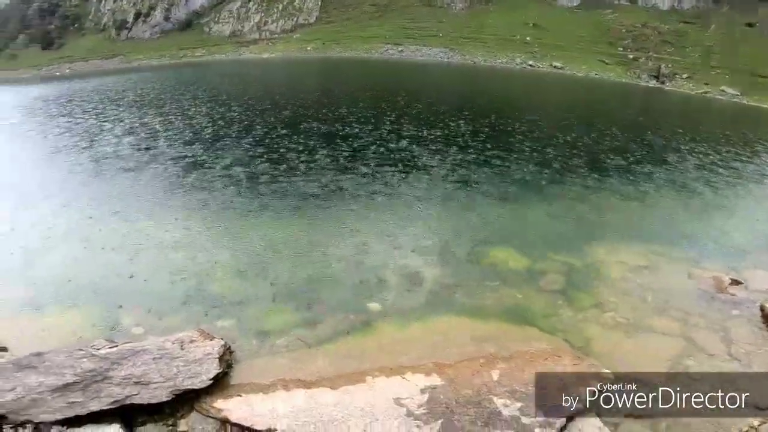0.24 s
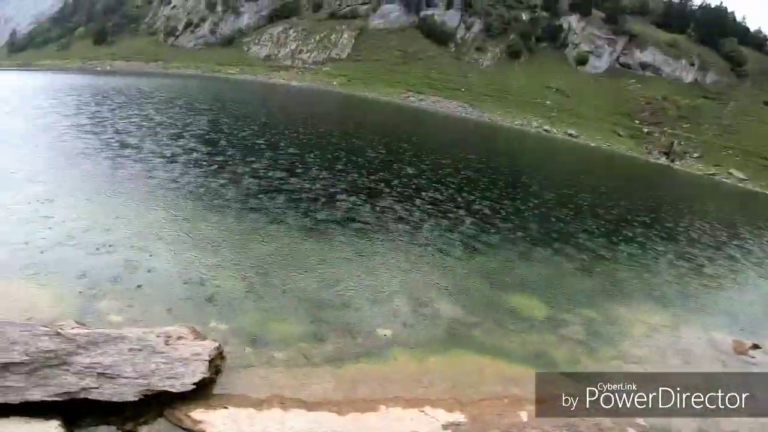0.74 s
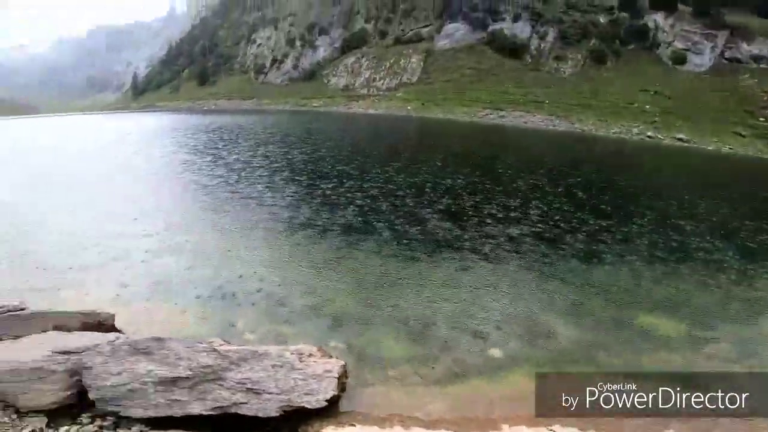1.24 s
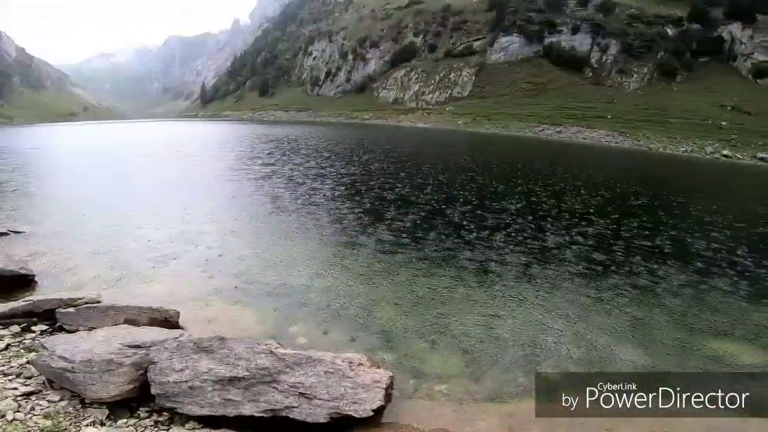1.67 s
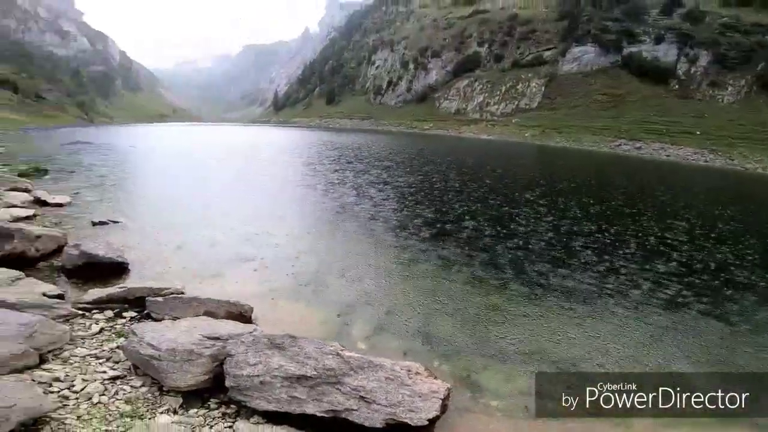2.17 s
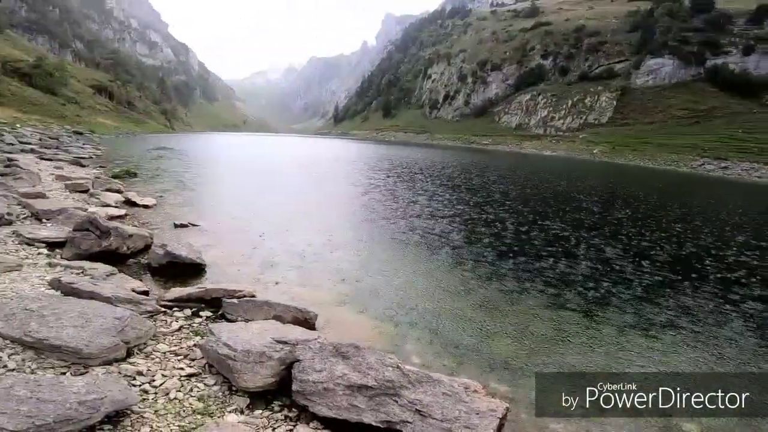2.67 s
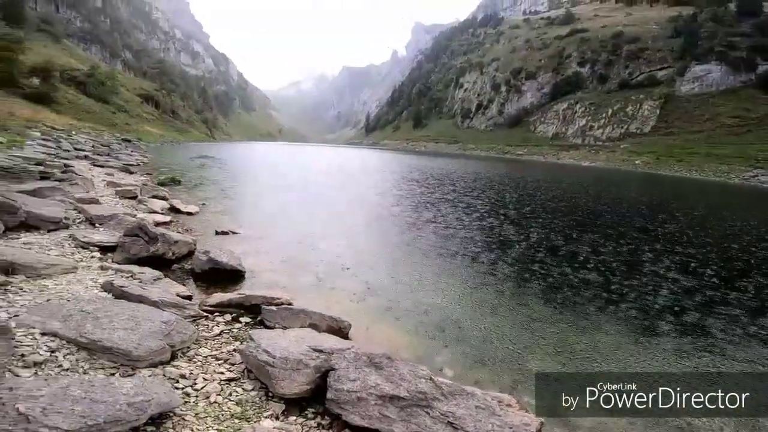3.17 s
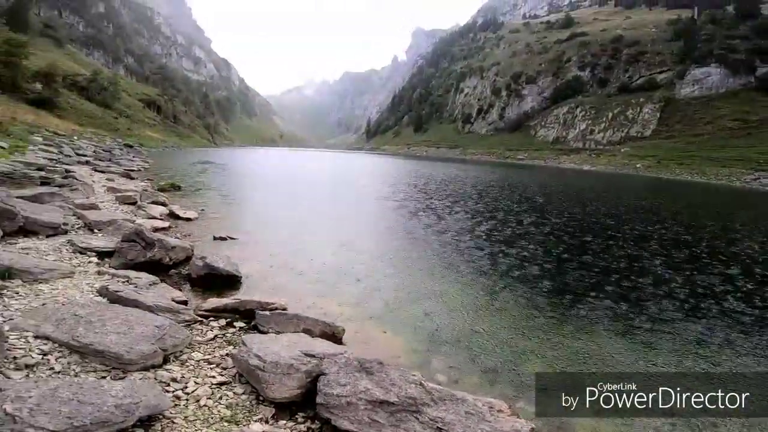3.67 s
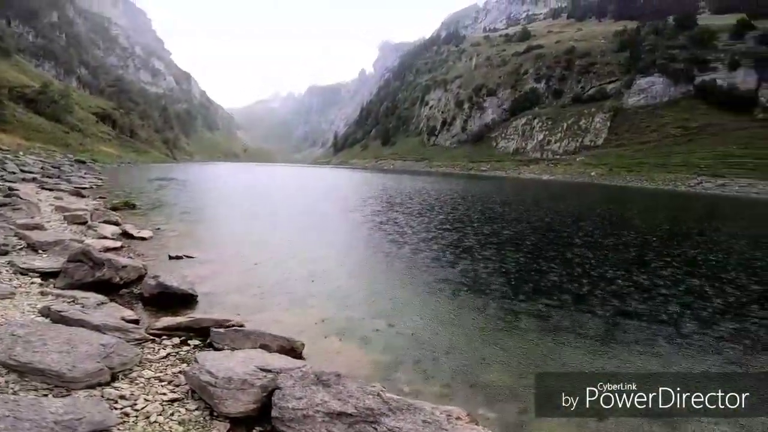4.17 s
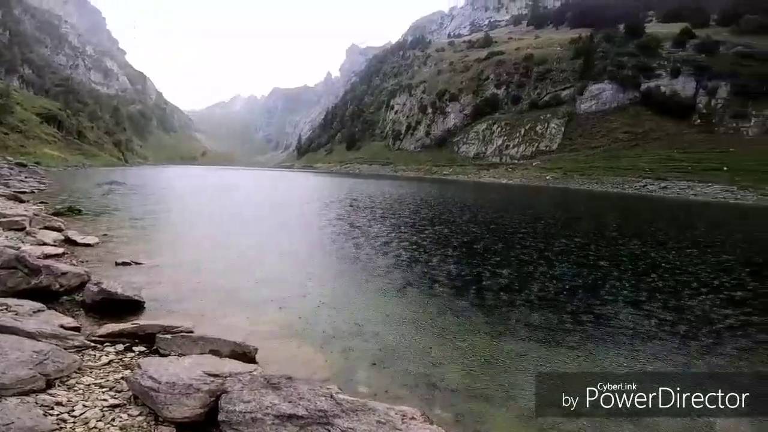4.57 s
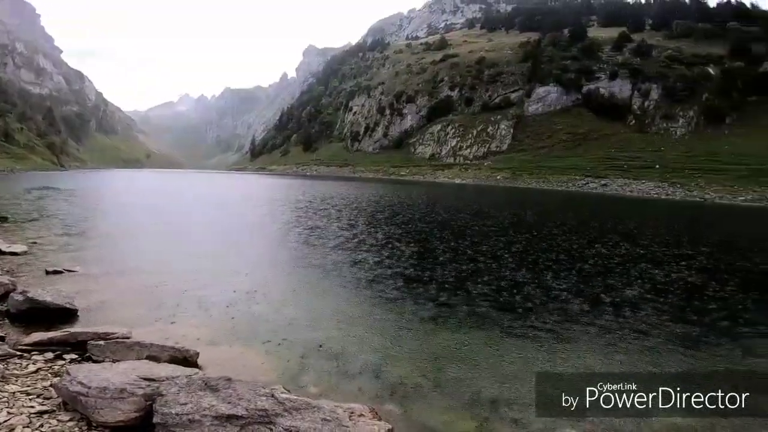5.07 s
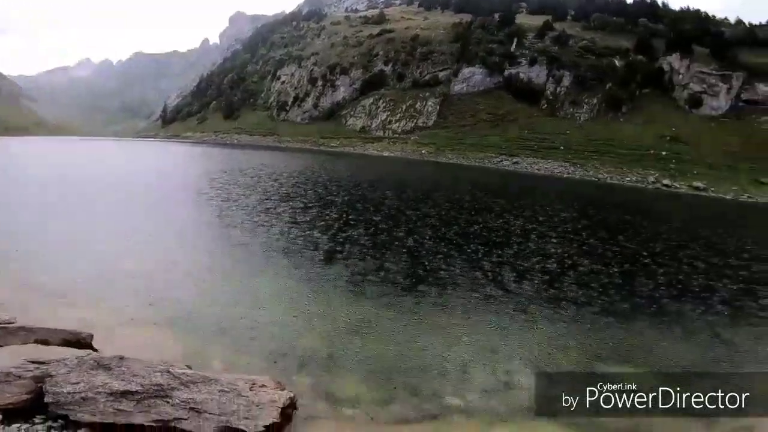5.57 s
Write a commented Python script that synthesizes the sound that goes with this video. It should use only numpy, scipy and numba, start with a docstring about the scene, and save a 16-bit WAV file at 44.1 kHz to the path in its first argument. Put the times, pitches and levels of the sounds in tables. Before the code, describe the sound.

Light rain falls steadily beside a still lake, heard through a hand-held phone. A quiet, wide hiss of distant rain lies beneath a dense patter of tiny bright ticks on water and rock, with nearer drops clicking at irregular moments and a few short, rising bubble plips. A faint low hum wavers underneath. From about 0.2 to 0.9 seconds the hand shifts on the phone: low thumps, rumble, small clicks and skin rubs. A light tap comes near 1.2, then hollow plastic knocks at 1.8 and 2.4. The rain continues evenly. A very loud, sharp crack strikes the case at 3.8, a softer tap at 4.25, and another loud, bright crack at 4.5. From 4.7 to the end at about 5.8, taps, scrapes and dull bumps return. The image begins mono and gradually opens to stereo after one second; there is no noticeable echo.

```python
"""Light rain on a still lake and shore rocks

Heard by a hand-held phone with two microphone ports. Far rain is banded noise; nearer drops are damped sines.
Drops and fingers tap the case and ring its modes; the hand rubs, presses and jolts it. A low narrow-band hum wavers.
The sound starts in mono and opens to stereo; loud peaks saturate softly and duck all but the bass."""
import sys
import numpy as np
from scipy import signal
from scipy.fft import rfft, irfft, next_fast_len
from scipy.io import wavfile
from scipy.ndimage import uniform_filter1d
from numba import njit

SR = 44100
rng = np.random.default_rng(int(sys.argv[2]) if len(sys.argv) > 2 else 0)


def output_pcm(signal):
    """Save a mono or channel-first signal as 16-bit PCM at the path in sys.argv[1].

    Samples are clipped to [-1, 1] before scaling.
    """
    pcm = np.clip(np.atleast_2d(signal).T, -1, 1) * 32767
    wavfile.write(sys.argv[1], SR, np.round(pcm).astype(np.int16))


N = 256662

# bending modes of the phone case: nominal_hz, level_db, t60_s, left_minus_right_db, left_lead_rad
CASE_MODES = [(422.5, 7, 0.022, -6, 3.5), (578, 7.5, 0.041, -3.5, 3), (740, 0.5, 0.014, -3.5, 4),
              (958, 11.5, 0.0088, -1, 4), (1272, 6, 0.016, 2.5, 3.5), (1448, 8.5, 0.017, 1, 3.5),
              (1840, 7.5, 0.0083, 1, 4), (2110, -0.5, 0.013, 9.5, 4.5), (2410, 5, 0.018, -2.5, 2.5),
              (2910, 5.5, 0.013, 3.5, 1.5), (3774, 2.5, 0.0078, 0, 0.8), (4560, -1, 0.0082, -7, 1),
              (5290, 3, 0.011, -2.5, 2), (6064, 14, 0.0056, 8, -1.33), (7750, 13, 0.0039, 7, 1)]
LOW_LEFT_GAIN = -0.28  # left port relative to right, for thuds and drone


def undb(db):
    """Amplitude ratio of a level in dB."""
    return 10 ** (np.asarray(db) / 20)


def level(x, rms_db=0):
    """Scale to an RMS level."""
    return x * undb(rms_db) / np.sqrt(np.mean(x ** 2))


def band(x, hz, width_hz):
    """Two-pole resonance, gain 1 at the centre."""
    return signal.lfilter(*signal.iirpeak(hz, hz / width_hz, fs=SR), x)


def cut(x, hz, kind, order=2):
    """Butterworth low-pass or high-pass."""
    return signal.sosfilt(signal.butter(order, hz, kind, fs=SR, output="sos"), x)


def walk(rate_hz):
    """Random levels held 1 / rate_hz and smoothed twice; spread near 1."""
    hold = int(SR / rate_hz)
    steps = np.repeat(rng.standard_normal(N // hold + 1), hold)
    return 1.65 * uniform_filter1d(uniform_filter1d(steps, hold), hold)[:N]


@njit
def rings(s, hz, t60_s, glide, left, right, n):
    """Damped sines, one per event; glide multiplies the pitch at each sample."""
    out = np.zeros((2, n))
    for k in range(len(s)):
        i, z = int(s[k] * SR), 1 + 0j
        fade, turn = np.exp(-np.log(1000) / (t60_s[k] * SR)), 2 * np.pi * hz[k] / SR
        while i < n and abs(z) > .002:
            out[0, i] += left[k] * z.imag
            out[1, i] += right[k] * z.imag
            z *= fade * np.exp(1j * turn)
            turn *= glide[k]
            i += 1
    return out


def ports(modes):
    """Each bending mode moves the two ports by its own amounts, with a phase lead on the left; modes are analytic."""
    _, _, _, pan_db, lead_rad = np.transpose(CASE_MODES)
    left = undb(pan_db / 2) * np.exp(1j * lead_rad) @ modes
    right = undb(-pan_db / 2) @ modes
    return np.array([left, right]).imag


def stirred(hz, centre_hz, above_oct, below_oct):
    """Share of a mode in a contact: Gaussian in octaves, with its own spread above and below the centre."""
    octaves = np.log2(hz / centre_hz)
    return np.exp(-.5 * (octaves / np.where(octaves < 0, below_oct, above_oct)) ** 2)


def touch(start_s, hold_s, rise_db_s, fall_db_s):
    """Gain of each contact over time: rises, holds and falls at steady dB rates."""
    t = np.arange(N) / SR - start_s[:, None]
    rise_db = rise_db_s * t
    fall_db = fall_db_s * (hold_s[:, None] - t)
    return undb(np.minimum(0, np.minimum(rise_db, fall_db)).clip(-120))


def hiss(colour, rms_db, swell_db):
    """Merged far drops: overlapping bands of noise at half-octave steps that swell together and flicker alone."""
    size = next_fast_len(N, real=True)
    hz = np.fft.rfftfreq(size, 1 / SR)[1:]
    colour_hz, colour_db = np.transpose(colour)
    shape = undb(np.interp(np.log(hz), np.log(colour_hz), colour_db))
    noise = rfft(rng.standard_normal(size))[1:] * shape
    out = 0
    for centre_oct in np.arange(4.5, 14.5, .5):  # octaves above 1 Hz
        share = np.clip(1 - 2 * abs(np.log2(hz) - centre_oct), 0, 1)
        flicker_db = (2.14 if centre_oct < 10.2 else 1.0) * walk(13)
        out = out + irfft(np.append(0, noise * share), size)[:N] * undb(flicker_db)
    return level(out * undb(swell_db), rms_db)


def far_rain():
    """Far rain and air: one hiss common to both ports, one opposed between them, on the same swell."""
    # noise colour of the common and the opposed part: hz, relative_db_per_hz
    mid_colour = [(18, -42), (30, -1.5), (86, -24), (131, -9.5), (161, 0), (554, -20), (740, -12.5),
                  (962, -14.5), (1500, -10), (3580, -7.5), (5900, -13), (7670, -26.5), (8980, -37),
                  (12300, -47.5), (16000, -61)]
    side_colour = [(18, -44.5), (30, -14.5), (95, -15), (141, -1.5), (184, -3), (554, -17), (844, -7),
                   (962, -11), (2230, -10.5), (3400, -14), (5900, -11.5), (7670, -22), (9710, -38.5),
                   (12300, -45.5), (16000, -64)]
    swell_db = .4 * walk(1.2) + 1.29 * walk(70)
    mid = hiss(mid_colour, -55, swell_db)
    side = hiss(side_colour, -55.5, swell_db)
    return mid + np.outer([1, -1], side)


def hum(centre_hz=154.6, width_hz=43, left_gain=0.45, waver_db=2.5):
    """Narrow-band noise of wavering level, stronger in the right port."""
    # hum level before the waver: time_s, level_db
    hum_levels = [(0, -69.5), (.5, -58), (.95, -58.5), (1.15, -51), (1.35, -54.5), (1.6, -69), (2.2, -55),
                  (2.55, -64.5), (2.9, -59), (3.3, -68), (4.1, -62), (4.6, -66.5), (5.1, -69), (5.48, -49),
                  (5.82, -61)]
    tone = level(band(band(rng.standard_normal(N), centre_hz, width_hz), centre_hz, width_hz))
    slow_db = np.interp(np.arange(N) / SR, *np.transpose(hum_levels))
    return np.outer([left_gain, 1], tone * undb(slow_db + waver_db * walk(6)))


def patter(count, floor_db, scatter_db, hz, spread_oct, cycles):
    """Small drops at random moments and places ring for some cycles; a few are much nearer than the rest."""
    moment, nearness = rng.random((count, 2)).T
    pitch_draw, ring_draw, pan_draw = rng.standard_normal((count, 3)).T
    size = undb(floor_db - scatter_db * np.log(nearness).clip(-2.2, 0))
    pitch_hz = hz * 2 ** (spread_oct * pitch_draw)
    t60_s = cycles * 2 ** (1.01 * ring_draw) / pitch_hz
    pan = undb(2.2 * pan_draw - 2.0)
    return rings(moment * N / SR, pitch_hz, t60_s, np.ones(count), size * pan, size / pan, N)


def drops(table, t60_s, rise_per_s, splash_db):
    """A near drop rings briefly under a shorter, brighter splash; rise_per_s is relative pitch growth."""
    s, db, hz, pan_db = np.transpose(table)
    left, right = undb(db + pan_db / 2), undb(db - pan_db / 2)
    steady = np.ones(len(s))
    glide, t60_s = (1 + rise_per_s / SR) * steady, t60_s * steady
    slow = rings(s, hz, t60_s, glide, left, right, N)
    # taking away a faster ring softens the first cycles
    fast = rings(s, hz, t60_s / 8, glide, left, right, N)
    splash = rings(s, 1.07 * hz, 0.0021 * steady, steady, left, right, N)
    return 0.63 * (slow - fast) + undb(splash_db) * splash


def near_drops():
    """Near drops tick on rock and water: short rings of steady pitch."""
    # near drops: start_s, nominal_level_db, pitch_hz, left_minus_right_db
    drop_table = [(0.1353, -41, 2840, 0.0), (0.1833, -37, 2600, 0.0), (.2124, -47, 2700, 0),
                  (0.2377, -41, 2490, -1), (.3197, -46, 2120, 0), (.4449, -42, 2620, 0),
                  (0.599, -36, 2410, 0.0), (.632, -42, 5400, 0), (.7527, -40, 5170, 0),
                  (.766, -44, 2640, 0), (.7996, -47, 2520, 0), (0.9814, -41.5, 2600, 0.0),
                  (1.055, -47.5, 2830, 2), (1.1643, -42, 4580, -0.5), (1.2735, -51, 3670, -1),
                  (1.323, -39, 2210, 0), (1.4511, -42, 2670, -1), (1.4641, -40.5, 3250, -1.0),
                  (1.5753, -38.5, 3600, 0.5), (1.6417, -43, 4350, -1), (1.708, -31.5, 3970, -1),
                  (1.7564, -43.5, 3630, -1), (1.8956, -39.5, 4270, -0.5), (1.933, -38.5, 2880, 4),
                  (1.9579, -38, 4490, 1.0), (2.0138, -41.5, 5740, 0), (2.0448, -41, 2900, -1),
                  (2.128, -41.5, 3700, 0), (2.145, -37, 4300, -0.5), (2.204, -35.5, 3910, 0.0),
                  (2.267, -30, 3900, -0.5), (2.5067, -40, 3670, -2.5), (2.5205, -43, 2990, -6),
                  (2.5381, -48.5, 3600, 0), (2.6484, -41.5, 3040, 0), (2.7641, -49, 2840, -8),
                  (2.7921, -42, 2860, -4.5), (2.9176, -37, 3680, -6), (3.045, -53, 3550, -2),
                  (3.1635, -45, 3860, -2), (3.2022, -43.5, 4780, -7), (3.3832, -42.5, 4920, -3),
                  (3.4103, -36.5, 3930, -5), (3.473, -40, 4360, 1), (3.485, -36.5, 3500, -3),
                  (3.5117, -36.5, 3100, -1.0), (3.6451, -37, 3410, -1), (3.7062, -39, 4020, -6),
                  (3.9709, -37.5, 3000, -1.0), (4.0113, -38, 3570, -1.5), (4.0895, -38, 3900, -2.5),
                  (4.2083, -44, 3750, -3), (4.312, -35, 3120, -9), (4.409, -42, 5170, -12),
                  (4.4544, -41, 3970, -8), (4.465, -33, 3290, -9.5), (4.4997, -38.5, 4240, -1),
                  (4.6857, -41.5, 4080, -4), (4.7361, -39.5, 3900, -1), (4.9257, -40, 4600, -1),
                  (4.9514, -38.5, 3370, -2.0), (5.022, -39, 4520, -9), (5.1632, -43, 3620, 3),
                  (5.3932, -36, 3410, 0.0), (5.4148, -33, 3980, -1.5), (5.4929, -39, 3310, -1),
                  (5.611, -41, 4000, -1), (5.62, -42.5, 4020, 1), (5.7044, -43, 3920, 6.5),
                  (5.796, -42, 4940, 1)]
    return drops(drop_table, t60_s=0.01, rise_per_s=0, splash_db=4.5)


def grip(shake_db=1.5):
    """The pressing hand makes rumble in both ports and a dull drone mostly in the right one."""
    # hand presses: start_s, hold_s, rumble_db, drone_db
    press_table = [(0.182, 0.021, -48, -50), (0.259, 0.035, -47, -49), (0.316, 0.023, -48, -55.5),
                   (0.362, 0.0094, -53, -42.5), (0.392, 0.028, -64, -55), (0.44, 0.031, -62, -54.5),
                   (0.503, 0.038, -71, -48.5), (0.574, 0.02, -52, -47.5), (0.611, .012, -64, -50.5),
                   (0.713, 0.012, -53.5, -54), (0.743, 0.037, -51.5, -53), (0.835, 0.012, -53, -60.5),
                   (1.191, 0.0075, -51, -55.5), (4.657, .008, -75, -53.5), (4.693, .018, -72, -44.5),
                   (4.74, 0.02, -66, -43.5), (4.787, 0.011, -75, -52.5), (4.807, 0.076, -73, -61.5),
                   (5.124, 0.0286, -66, -57), (5.195, 0.092, -62, -58), (5.314, 0.015, -51, -46.5),
                   (5.516, 0.0088, -38.5, -59), (5.574, 0.03, -56.5, -51), (5.635, 0.0123, -39, -53),
                   (5.743, 0.025, -57, -80), (5.79, .03, -59, -55)]
    start_s, hold_s, rumble_db, drone_db = np.transpose(press_table)
    press = touch(start_s, hold_s, rise_db_s=895.5, fall_db_s=640)
    shake = rng.standard_normal(N) * undb(shake_db * walk(40))
    drone = level(cut(band(band(shake, 157.7, 72), 160, 324), 162, "high", order=4))
    drone = drone * 2 / (1 + LOW_LEFT_GAIN)  # drone_db is that of the mean of both ports
    mid, side = level(band(band(rng.standard_normal((2, N)), 35, 79), 35, 79))
    rumble = mid + 0.89 * np.outer([1, -1], side)
    drone_gain = undb(drone_db) @ press
    rumble_gain = undb(rumble_db) @ press ** 2  # squared: rises and falls twice as fast in dB
    return drone_gain * np.outer([LOW_LEFT_GAIN, 1], drone) + rumble_gain * rumble


def jolts(cycles=7.23):
    """The hand jolts the phone: low damped sines, alike in both ports, 60 dB down after some cycles."""
    # jolts: start_s, level_db, pitch_hz
    jolt_table = [(0.185, -30, 57), (0.281, -38, 45), (.352, -34.5, 65.2), (.468, -47, 50),
                  (1.188, -44, 61), (5.516, -47, 61), (5.545, -48, 45), (5.666, -37, 51)]
    s, db, hz = np.transpose(jolt_table)
    return rings(s, hz, cycles / hz, 1 + 0 * s, undb(db), undb(db), N)


def rubs(slip_db=1.5, blur=2.7):
    """Uneven slips of skin over the case stir the modes near the place of contact."""
    # rubs: start_s, hold_s, level_db, centre_hz, spread_oct (above the centre; narrower below)
    rub_table = [(0.254, 0.14, -44.5, 1884, 0.13), (0.26, 0.006, -46, 2800, 0.12),
                 (0.319, 0.044, -53, 3800, .15), (0.281, 0.084, -47, 5100, 0.098),
                 (0.534, 0.04, -44, 510, 0.59), (0.6, 0.043, -47, 450, 0.5),
                 (0.71, 0.0375, -48, 2050, 0.332), (0.712, 0.06, -52, 5200, 0.1),
                 (0.754, 0.06, -54, 1800, 0.43), (0.998, 0.07, -48, 1300, 0.43),
                 (4.667, 0.022, -53, 960, .15), (4.722, 0.038, -44, 980, .12),
                 (4.768, 0.027, -42.5, 980, 0.12), (4.806, 0.0095, -53, 960, .12),
                 (5.136, 0.102, -54.5, 1090, 0.43), (5.266, 0.036, -40.5, 580, .1),
                 (5.272, 0.026, -34.5, 1250, 0.17), (5.278, 0.019, -47, 2130, 0.2),
                 (5.277, 0.03, -50.5, 3900, 0.29), (5.336, 0.11, -49, 1290, 0.27),
                 (5.564, 0.058, -47.5, 600, 1.77), (5.694, 0.15, -50, 1550, 0.16)]
    start_s, hold_s, db, centre_hz, spread_oct = np.transpose(rub_table)
    skin = rng.standard_normal(next_fast_len(N))
    skin[:N] *= undb(slip_db * walk(250))
    skin = signal.hilbert(skin)[:N]
    shares = np.array([undb(mode_db) * stirred(hz, centre_hz, spread_oct, 0.455 * spread_oct)
                       for hz, mode_db, *_ in CASE_MODES])
    contact = touch(start_s, hold_s, rise_db_s=1300, fall_db_s=1000)
    gains = shares / np.linalg.norm(shares, axis=0) * undb(db) @ contact
    # quickly damped modes get wide bands
    modes = np.array([band(band(skin, hz, blur / t60_s), hz, blur / t60_s) for hz, _, t60_s, *_ in CASE_MODES])
    return ports(gains * modes / modes.real.std(axis=1, keepdims=True))


def taps(crack_damp=1.17, grit_db=-12, grit_t60_s=0.022, rise_s=.0002, detune=.008, thud_hz=196, thud_s=0.0025):
    """A blow rings the modes near its centre, cracks in a second group of modes, and thuds mostly in the right port."""
    # drops and fingers striking the case: start_s,
    # ring: level_db, centre_hz, above_oct, below_oct, left_minus_right_db,
    # bright crack: level_db, centre_hz, above_oct, below_oct, left_minus_right_db, then thud_db
    tap_table = [(0.2634, -29, 2375, 0.23, 0.22, 6, -35, 4690, 0.15, .07, -4, -60),
                 (0.2676, -27.5, 2760, 0.12, 0.13, 5, -28, 5300, 0.079, .06, -3, -62),
                 (0.2773, -42, 2400, .4, 0.154, 2, -35, 5100, 0.1, .12, -10, -39.5),
                 (.345, -30.5, 670, 0.3, 0.126, -2.5, -42, 3800, .5, .2, 0, -44),
                 (.492, -31.5, 740, 0.08, .04, -3, -55, 3800, .5, .2, -3, -59),
                 (.552, -35, 600, 0.28, .11, -1, -36.5, 4600, 0.23, 0.19, 2, -29.5),
                 (1.188, -30.5, 1760, 0.17, .08, 3, -33.5, 5950, 0.52, .2, -11, -30),
                 (1.8376, -15, 903, 0.69, .25, -0.5, -27, 4170, 0.33, 0.223, -18.5, -27),
                 (1.87, -30.5, 800, 1.4, 0.68, 0, -42, 3800, .5, .2, -2, -62),
                 (2.423, -14, 900, 0.71, 0.304, 0.5, -22, 4010, 0.35, 0.29, -10, -27),
                 (3.131, -42, 905, 0.37, .15, 12, -33.5, 3270, 0.42, .16, -3, -54),
                 (3.299, -35, 855, 0.73, 0.314, 7.5, -37, 3800, 0.38, .18, 0, -59),
                 (3.8142, -4.5, 1814, 0.2, 0.19, 4, -1.5, 3900, 0.61, 0.83, 1, -33),
                 (4.243, -21.5, 1220, 0.615, 0.324, -2.5, -30.5, 4400, 0.153, .06, 1, -41),
                 (4.25, -31, 1380, 0.24, 0.12, 1, -33, 4450, 0.3, .13, -6, -42),
                 (4.5417, -10.5, 1440, 0.28, 0.28, 0.5, -7.5, 2400, 4.0, 0.11, 1, -46),
                 (4.710, -23, 1800, 0.22, 1.1, -1.5, -45, 5300, .1, .15, -8, -20),
                 (5.122, -33.5, 440, 0.71, .3, -2, -45, 2100, .3, 0.127, -3, -29),
                 (5.227, -40, 502, 0.38, 0.17, -1.5, -40, 2000, 0.25, .1, 3, -30.5),
                 (5.317, -45, 449, .4, .15, -4, -48, 3800, .5, .2, 2, -35),
                 (5.514, -33, 810, 0.88, 0.32, 0, -36.5, 3800, 0.62, .2, -3, -24),
                 (5.634, -32.5, 700, 1.22, .54, -0.5, -39, 3800, 0.33, .17, 0, -29),
                 (5.668, -52, 450, .4, .15, 7, -55, 3800, .5, .2, 0, -40),
                 (5.8, -40.5, 754, 0.44, .17, 4, -39, 2090, .5, .2, 4, -27)]
    hz, mode_db, t60_s = np.transpose(CASE_MODES)[:3]
    out, t = np.zeros((2, N)), np.arange(2048) / SR
    thud = np.sin(2 * np.pi * thud_hz * t) * t / thud_s * np.exp(1 - t / thud_s)
    onset = (1 - np.exp(-t / rise_s)) ** 2
    sense = (-1) ** np.arange(len(hz))  # neighbouring modes swing in opposite senses
    for s, *contact, thud_db in tap_table:
        ring, crack = contact[:5], contact[5:]
        gain_draw_db, pitch_draw = rng.standard_normal((2, len(hz)))
        grit = band(rng.standard_normal((2, len(t))) * 1000 ** (-t / grit_t60_s), 3300, 7400)
        swing = np.exp(2j * np.pi * np.outer(hz * (1 + detune * pitch_draw), t)) * onset
        blow = undb(thud_db) * np.outer([LOW_LEFT_GAIN, 1], thud) + undb(crack[0] + grit_db) * grit
        for (db, *place, pan_db), damp in ((ring, 1), (crack, crack_damp)):
            gain = sense * undb(mode_db + gain_draw_db) * stirred(hz, *place)
            part = ports(gain[:, None] * swing * 1000 ** -np.outer(damp / t60_s, t))
            part_db = db + np.array([[pan_db], [-pan_db]]) / 2
            blow += part / abs(part).max(axis=1).mean() * undb(part_db)
        i = int(s * SR)
        out[:, i:i + len(t)] += blow[:, :N - i]
    return out


def bubbles():
    """Drops that trap a bubble ring longer, and their pitch rises."""
    # bubble drops: start_s, nominal_level_db, start_pitch_hz, left_minus_right_db
    bubble_table = [(0.462, -34.5, 2336, 0.0), (0.8589, -37, 1940, 0.0), (1.2356, -35, 3130, -10),
                    (2.076, -39.5, 1620, 9), (2.1655, -39, 2644, 0), (2.283, -37, 3500, -2),
                    (3.9762, -38, 2250, 2), (4.0327, -33.5, 1965, -3), (4.084, -42.5, 1605, -15),
                    (4.9817, -33, 3300, -6), (5.47, -38, 2970, -6), (5.612, -33, 1508, -2),
                    (5.784, -37.5, 1600, -2)]
    return drops(bubble_table, t60_s=0.033, rise_per_s=7.5, splash_db=-2.5)


def scene():
    """Far rain and hum under the near drops and the handling, which the ports dull."""
    # small drops ring a little on water and click on rock
    water = patter(count=1600, floor_db=-54.5, scatter_db=5.5, hz=3600, spread_oct=0.51, cycles=10.5)
    rock = patter(count=3200, floor_db=-48.5, scatter_db=5.5, hz=3870, spread_oct=0.45, cycles=2.3)
    ticks = water + rock + near_drops() + bubbles()
    # small drops send out little bass
    near = cut(ticks, 1730, "high") + grip() + jolts() + rubs() + cut(taps(), 182, "high")
    return far_rain() + hum() + cut(near, 6820, "low", order=5)


@njit
def follow(x, hold, release):
    """Peak follower: jumps up, waits hold samples, then sinks by the factor release per sample."""
    e, wait, out = 0., 0., np.empty(len(x))
    for i in range(len(x)):
        if x[i] > e:
            e, wait = x[i], hold
        elif wait > 0:
            wait -= 1
        else:
            e *= release
        out[i] = e
    return out


def record(dry):
    """Mono opens to stereo; soft overload; gain control ducks all but the bass at loud peaks; steep cut at the top."""
    open_s, open_tau_s, overload = 1.1, 0.71, 0.45
    duck_hz, duck_top_db, duck_hold_s, duck_release_s = 392, -8, 0.041, 0.062
    t = np.arange(N) / SR
    width = 1 - np.exp(-np.clip(t - open_s, 0, None) / open_tau_s)
    mid, side = (dry[0] + dry[1]) / 2, (dry[0] - dry[1]) / 2
    wide = mid + np.outer([1, -1], width * side)
    wide = np.tanh(overload * wide) / overload
    bass = cut(wide, duck_hz, "low", order=1)
    peak = follow(abs(wide).max(axis=0), duck_hold_s * SR, np.exp(-1 / (duck_release_s * SR)))
    gain = np.minimum(1, undb(duck_top_db) / (peak + 1e-9))
    late_gain = signal.lfilter([.01], [1, -.99], gain - 1) + 1  # needs a few ms to come down
    out = np.clip(bass + late_gain * (wide - bass), -1, 1)
    return signal.sosfilt(signal.ellip(12, .2, 100, 16300, fs=SR, output="sos"), out)


dry = scene()
out = record(dry)
output_pcm(out)
```